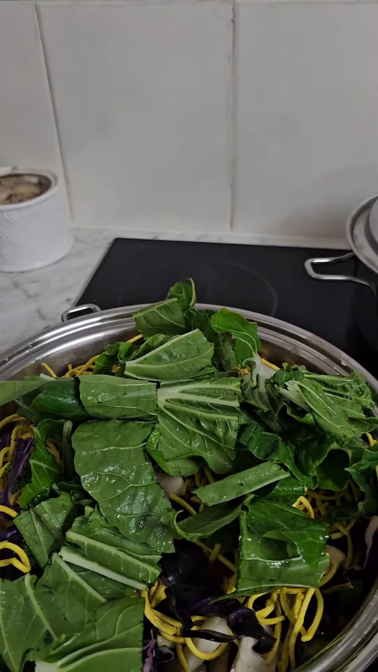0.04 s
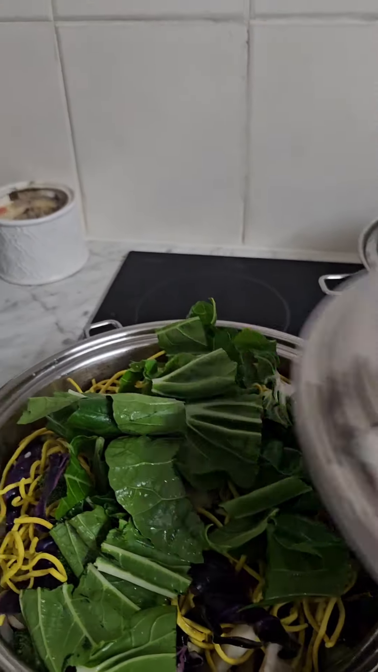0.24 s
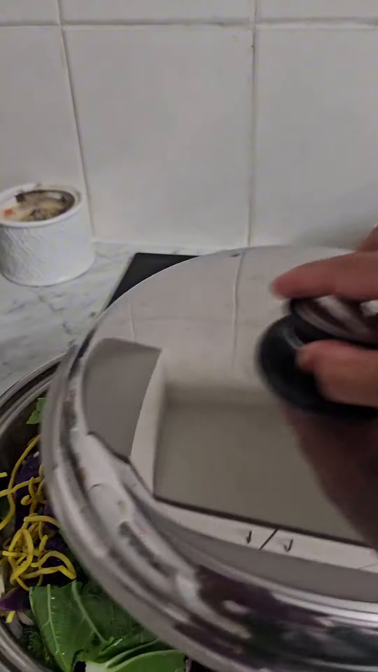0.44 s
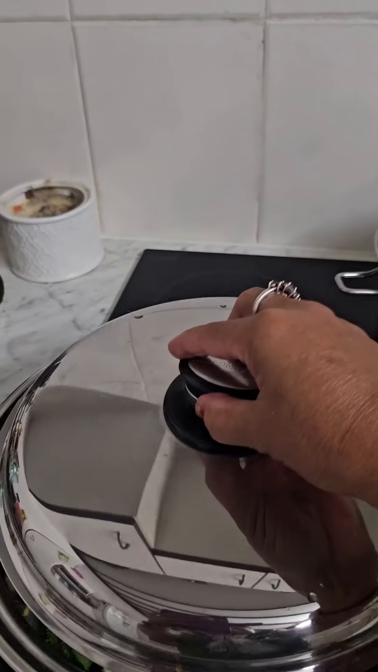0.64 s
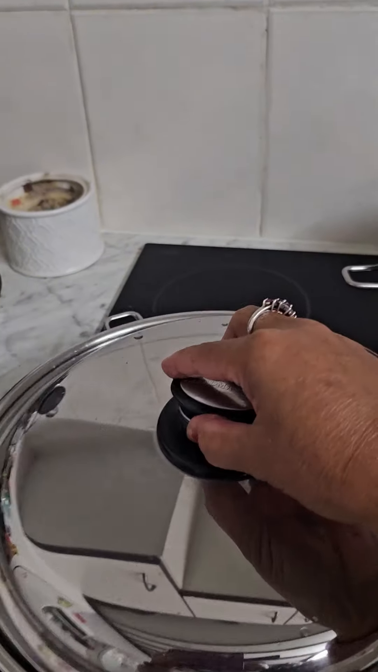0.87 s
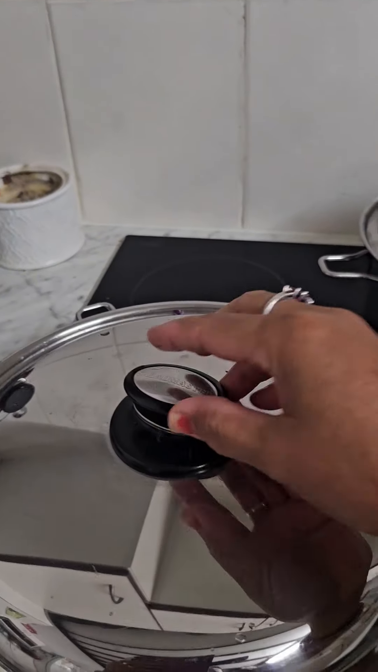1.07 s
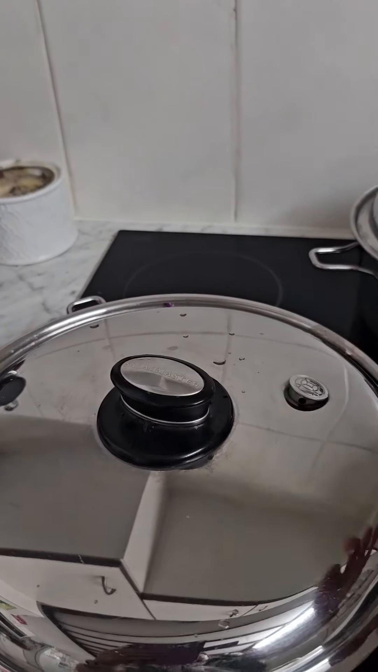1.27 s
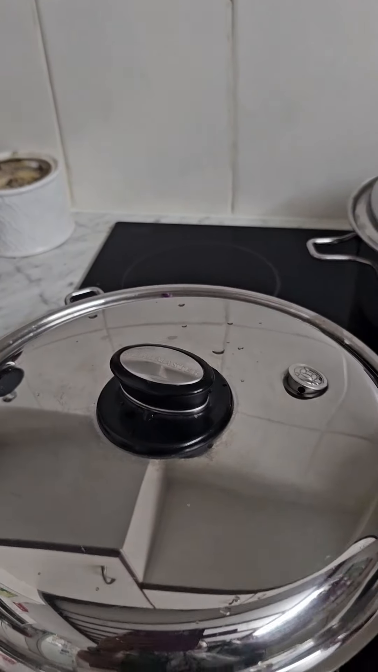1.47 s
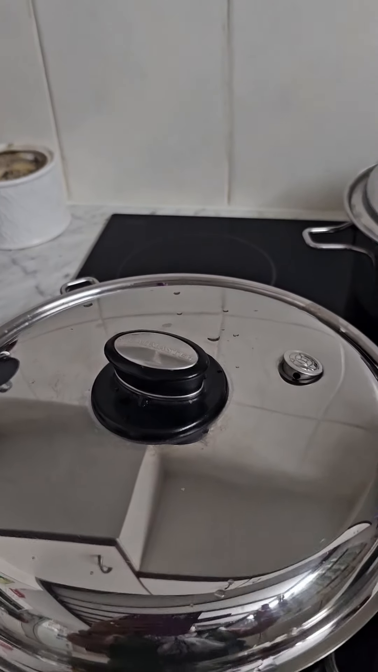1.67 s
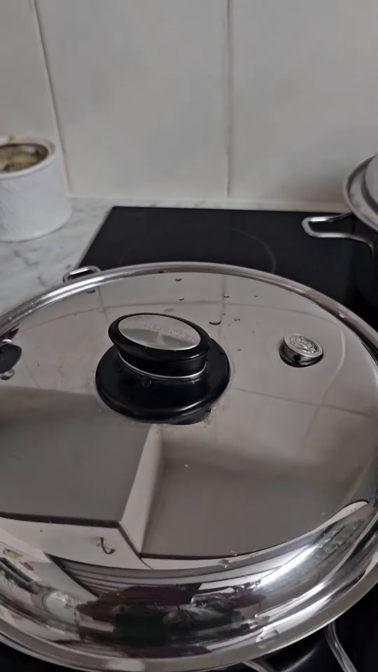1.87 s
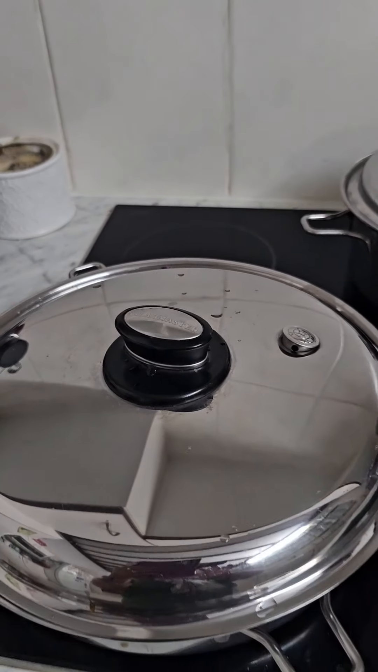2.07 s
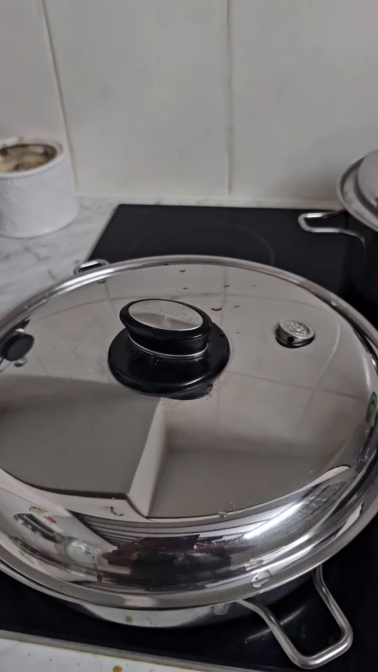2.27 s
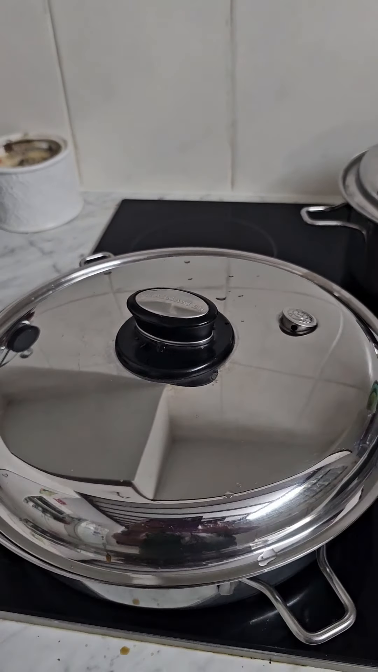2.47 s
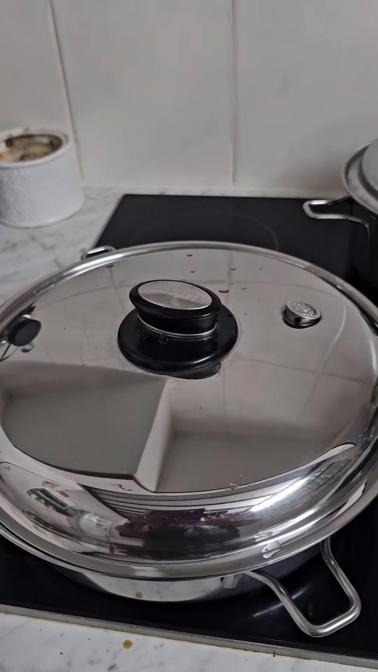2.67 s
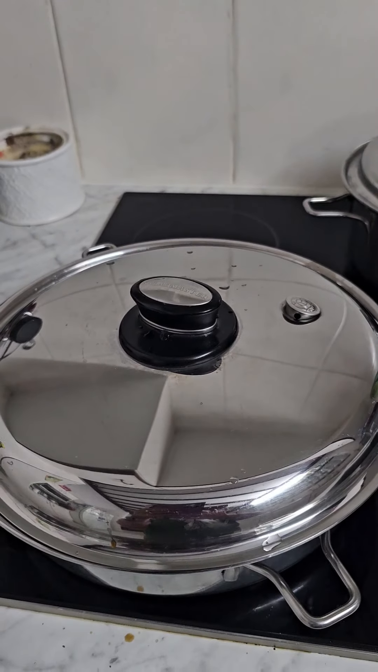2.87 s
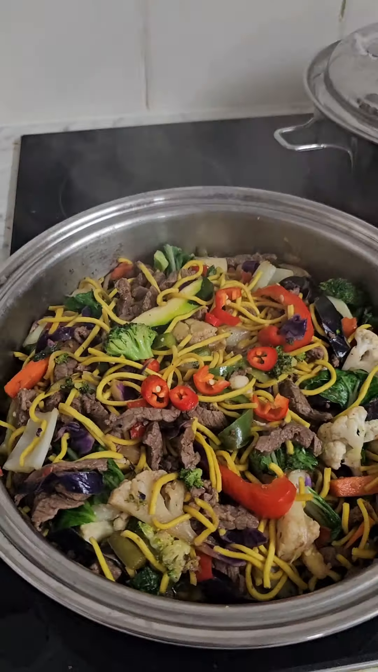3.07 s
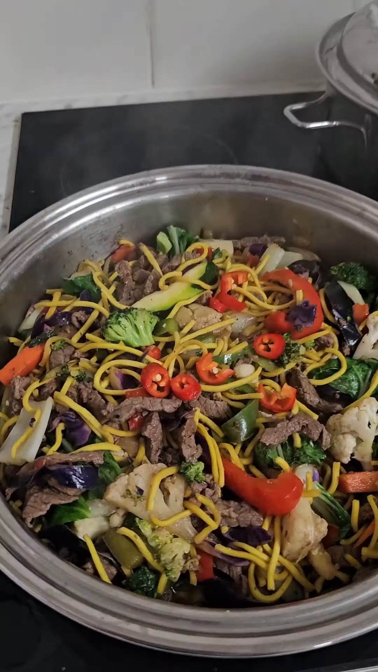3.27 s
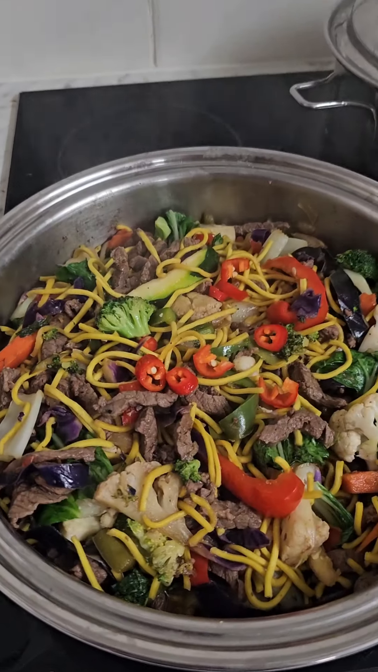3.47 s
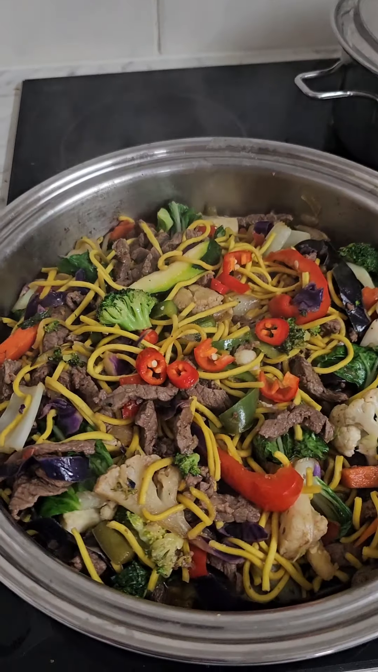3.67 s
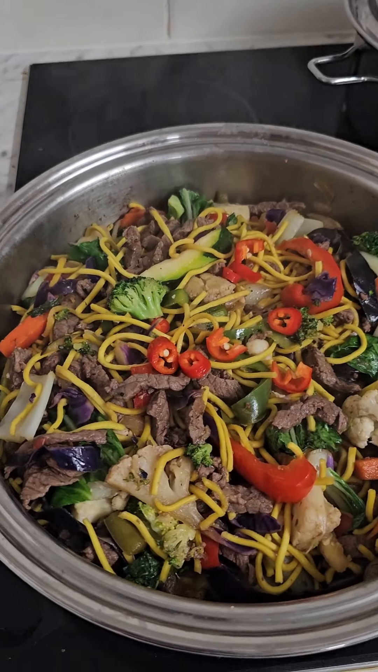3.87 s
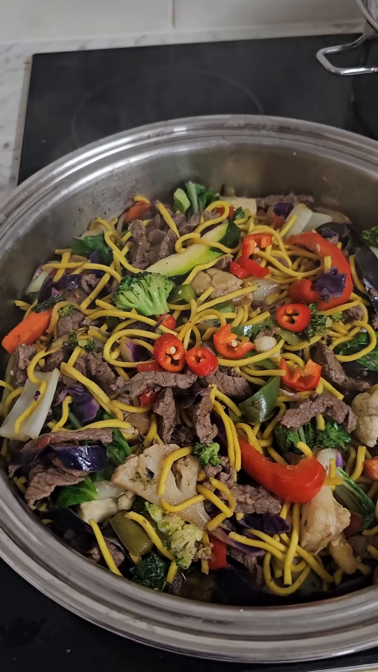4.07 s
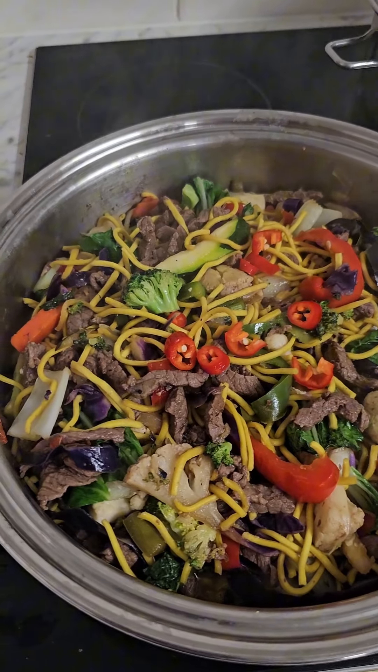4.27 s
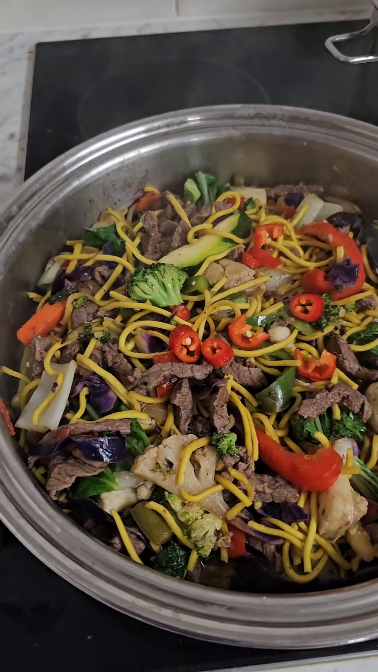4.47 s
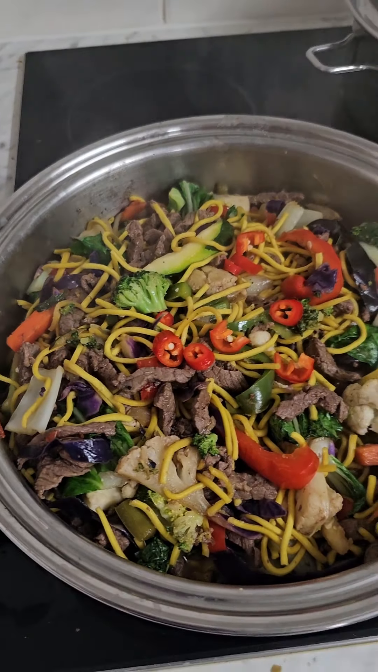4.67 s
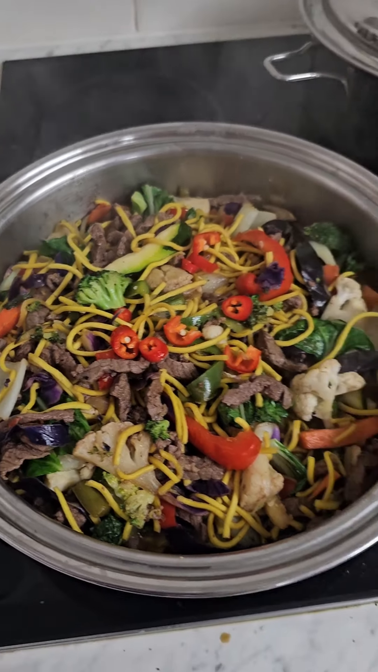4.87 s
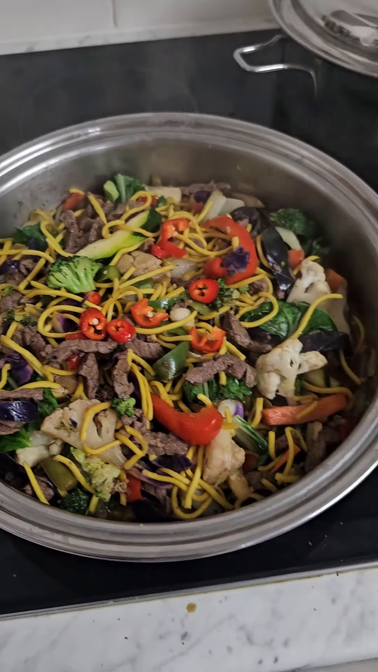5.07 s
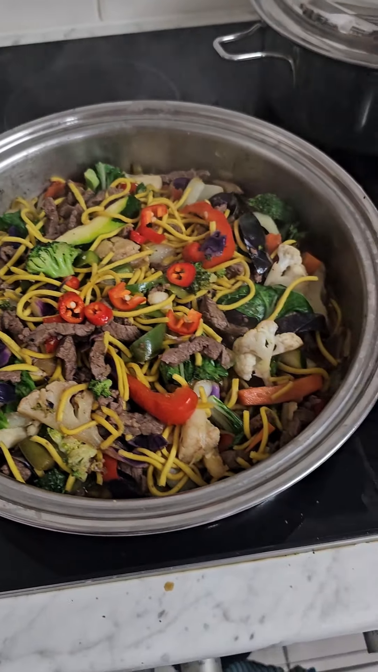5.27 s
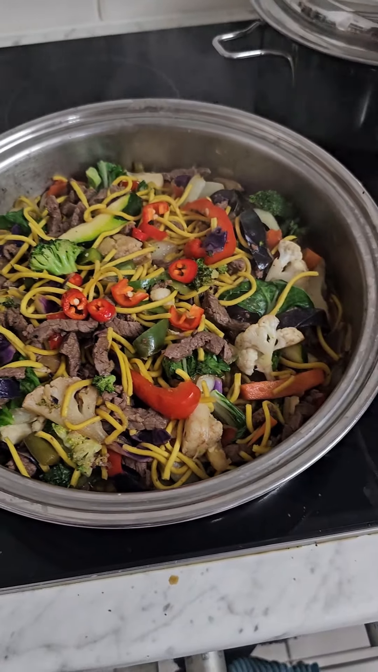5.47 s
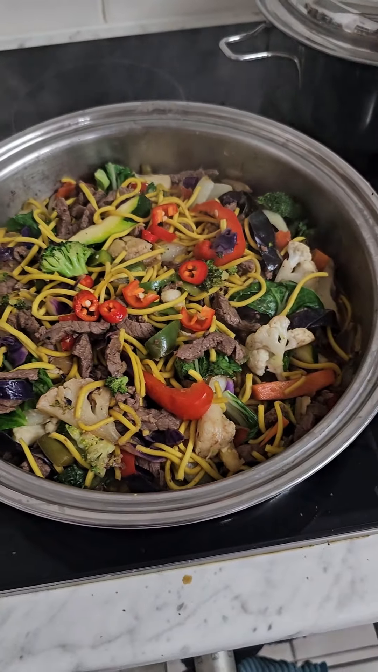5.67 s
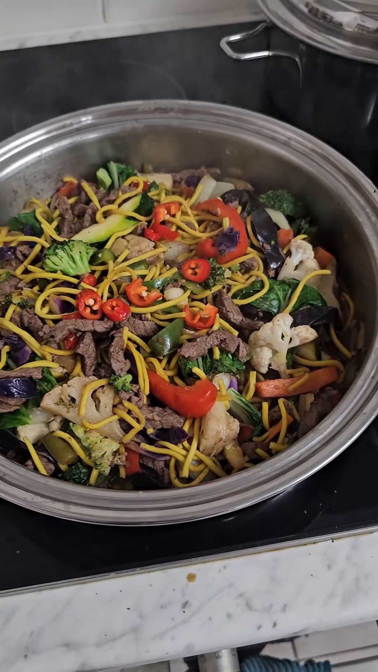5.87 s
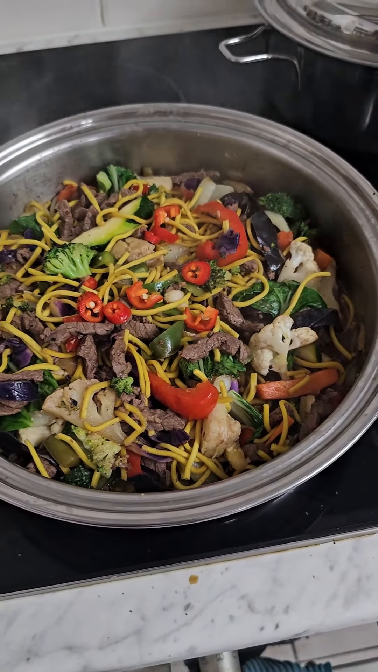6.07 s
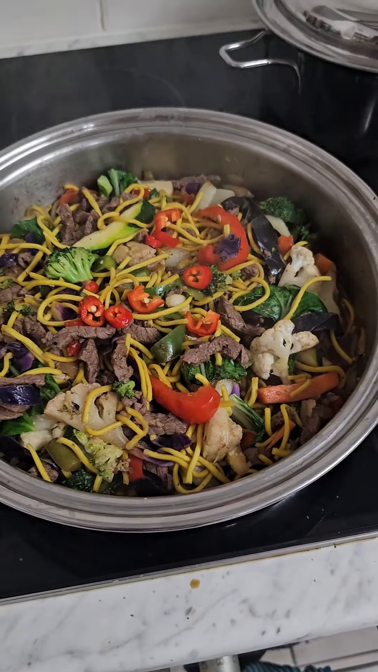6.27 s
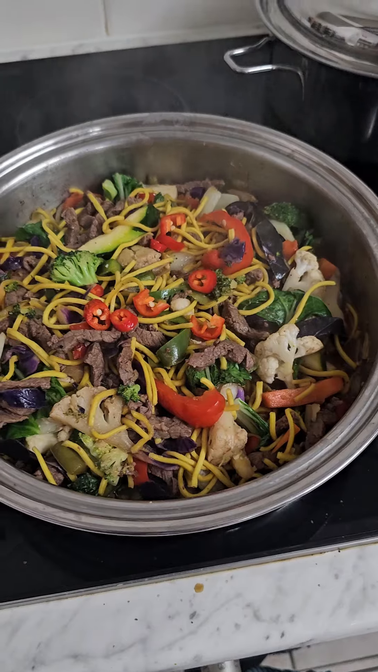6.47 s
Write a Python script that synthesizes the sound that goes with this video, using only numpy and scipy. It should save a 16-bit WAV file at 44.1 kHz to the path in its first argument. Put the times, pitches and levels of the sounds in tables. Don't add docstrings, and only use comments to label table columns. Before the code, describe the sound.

A steel lid clanks, rocks and settles onto a sizzling pan, muffling it to rumble; then an open pan simmers beside a steadily clinking steel weight.

```python
import sys
import numpy as np
from scipy import signal
from scipy.fft import rfft, irfft, next_fast_len
from scipy.io import wavfile
from scipy.ndimage import uniform_filter1d

SR = 44100
rng = np.random.default_rng(int(sys.argv[2]) if len(sys.argv) > 2 else 0)


def unload_audio(sound):
    columns = np.transpose(np.atleast_2d(sound))
    steps = np.round(np.clip(columns, -1, 1) * 32767)
    wavfile.write(sys.argv[1], SR, steps.astype(np.int16))


def attenuation_scalar(level_db):
    decades = np.asarray(level_db, float) / 20
    return 10 ** decades


N = 287532
CUT_S = 3.112

# (pitch [Hz], level [dB], time to fade by 60 dB [s])
LID_TILTED = [(117.7, -10, 0.49), (301.5, 1.5, 0.086), (402, 4, 0.12), (566, -8.5, 0.27), (702, -5, 0.13),
              (1060, -8, 0.11), (1188, -19.5, 0.39), (1323, -29, 0.14)]
LID_ROCKING = [(131, -9.5, 0.51), (282.7, 1.5, 0.46), (369.6, -9.5, 0.68), (500, 1.5, 0.2),
               (558, -7.5, 0.43), (693, -8, 0.37), (826, -6, 0.13), (1072, -13, 0.3), (1134, -7, 0.34),
               (1355, -11.5, 0.12)]
LID_SLIDING = [(282, 1, 0.21), (486.9, -21, 0.41), (836, -6, 0.18), (1080, -24, .3), (1125, -5, 0.27),
               (1173, -8, .4), (1330, -20, 0.092), (2010, -35, .6), (2170, -45, 0.55), (2950, -51, 0.23),
               (3900, -29, 0.22), (5124, -31, 0.16), (5543, -34, 0.13), (6260, -26, 0.23)]
LID_SEATED = [(112.6, -12.5, 0.28), (270.6, -2.5, 0.19), (300, -0.5, 0.11), (376, -13, 0.17),
              (420, -23, 0.11), (506, -20.5, 0.19), (605, -27, 0.11), (690, -20.5, 0.22), (990, -24, 0.067),
              (1050, -21, 0.11), (1200, -25.5, 0.37), (1980, -44, 0.15), (2900, -56, 0.15),
              (5070, -41.5, 0.1), (6290, -40, 0.1), (7440, -48, 0.2)]
LID_AT_REST = [(116, 1, 0.15), (300, 1, 0.077), (341, -2, 0.14), (710, -24, 0.099), (1230, -17, 0.18),
               (1870, -32, 0.097), (2770, -25, 0.15), (4021, -18, 0.22), (3800, -17, 0.12),
               (5000, -28, 0.11), (7530, -42, .15)]
# (pitch [Hz], level [dB], fade time [s])
DOME = [(1946, 0, .35), (2186, -14, .3)]
RIM_FREE = [(4807, -3, .13), (5071, -3, .12), (6051, -7, .5), (6815, -11, .5), (7138, -9, .5),
            (8317, -10, .5), (8635, -5, .25), (9259, -9, .5), (9798, 0, .15), (10690, -8, .15),
            (10940, -8, .33), (11280, 0, .11)]
RIM_TOUCHING = [(2864, -16, .4), (3822, -16, .26), (4032, -16, .4), (5066, -3, .14), (5150, -3, .16),
                (5543, -6, .2), (6288, -7, .2), (6525, -3, .2), (7142, -8, .25), (7480, -8, .2),
                (8436, -7, .2), (10160, -7, .13), (11720, -11, .2)]
# (pitch [Hz], level [dB], fade time [s])
RUBBED_TONES = [(1187, 2, 0.27), (1133, -17, 0.26)]
# (pitch [Hz], left minus right [dB])
LID_LEAN = [(300, 0), (400, -1.5), (500, -3), (560, 6), (700, 5.5), (830, 5), (1070, -2.5), (1187, -6),
            (1946, -6), (3000, -1)]

# (time [s], body level [dB], 1 kHz rim level above body [dB], clink level above body [dB])
KNOCKS = [
    (0.707, -5, -16, -23),
    (0.711, -16.5, -12, -5),
    (0.749, -39, 4, -23),
]
ROCKS = [
    (0.7885, -7, -10, -14),
    (0.805, -20, 4.5, -13),
    (0.810, -24, -6, 4.5),
    (0.821, -16, -3.5, -10),
]
SLIDES = [
    (0.834, -14, -10, -18),
    (0.85, -18, -12, -15),
    (0.866, -36, -15, -13),
]
SEATS = [
    (0.897, -10.5, -28, -42),
    (0.91, -14, -13, -24),
    (0.922, -12.5, -27, -29),
    (0.937, -14.5, -36, -37),
    (0.948, -15, -52, -40),
    (0.972, -24, -28, -13),
]
SETTLES = [
    (1.004, -21.5, -26, -21),
    (1.044, -44, -14, -17),
]
# (time [s], peak level [dB])
DOME_BLOWS = [
    (.708, -30),
    (.789, -33),
    (.81, -40),
    (.835, -35),
    (.91, -49),
]
# (time [s], pitch [Hz], peak level [dB], fade time [s])
RIM_RINGS = [
    (.712, 6090, -51, .3),
    (.792, 5090, -32, 0.11),
    (.806, 5110, -31, 0.15),
    (.808, 6525, -37, 0.21),
    (.865, 5160, -44, 0.13),
    (1.003, 4021, -47, 0.14),
    (1.012, 2867, -51, 0.18),
    (1.003, 5030, -48, 0.12),
]
# (time [s], level [dB])
CHATTER_LEVEL = [
    (0.707, -39.5),
    (0.713, -40),
    (0.771, -55.5),
    (0.811, -39.5),
    (0.893, -50.5),
    (0.917, -44.5),
    (0.953, -55),
    (1.017, -58),
    (1.12, -96),
]
# (pitch [Hz], level per Hz [dB])
CHATTER_COLOUR = [(1350, -13), (2100, -2), (2450, -17), (2900, -6.5), (3300, -14), (3700, -13), (4000, -14),
                  (4600, -15.5), (5100, -8.5), (6340, -12), (10600, -9), (13300, -6), (16000, -21)]

# (pitch [Hz], level [dB], fade time [s])
VALVE_MODES = [(1195, 0, .2), (1270, -4, .17), (1570, -8, .15), (2000, -14, .15), (2550, -9, .15),
               (2685, -4, .25), (3270, -3, .25), (3380, -6, .2), (3870, -8, .2), (4010, -3, .2),
               (4090, -8, .2), (4480, -8, .25), (4710, 0, .24), (4770, -7, .26), (4830, -4, .26),
               (4955, -9, .28), (5250, -9, .3), (5290, -2, .22), (5650, -3, .3), (5690, 0, .24),
               (5819, -5, .2), (6170, -3, .22), (6210, -9, .3), (6330, -9, .2), (6655, -3, .27),
               (6718, 1, .24), (6840, -7, .15), (7250, -8, .15), (7620, -5, .2), (7765, 0, .22),
               (7690, -6, .2), (7865, -4, .2), (7980, -4, .24), (8090, -6, .3), (8180, -8, .2),
               (8410, -10, .2), (8740, -5, .2), (8948, 0, .3), (9730, -4, .17), (9850, -7, .17),
               (10175, -3, .22), (10980, -8, .13), (11490, -8, .2), (11810, -5, .17), (12210, -4, .13),
               (12490, -7, .12), (12870, -7, .13), (13505, -5, .13), (14390, -10, .11), (15240, -12, .11)]
# (time [s], peak level [dB], lid knock [dB], 8 kHz ring [dB], 9 kHz ring [dB])
DROPS = [(3.332, -23.5, 3, 1, 4), (3.5787, -22, -1.5, 1, 5), (3.913, -21, 0, 3, 3),
         (4.2187, -20.5, -4, 1, 3.5), (4.5303, -22.5, -1.5, 0, 1), (4.8817, -21, -2, 0.5, 4.5),
         (5.1794, -21, -3, 2, 12), (5.5144, -20.5, 2, -7, -5), (5.8388, -23.5, 2, 1, 7.5),
         (6.15, -21.5, 3.5, -0.5, -6), (6.44, -21, -4, 1, 12.5)]
DROP_BANDS_DB = [-14, -14.5, -5.5, -6, -18, -4.5]
VALVE_CROWD_DB = [-18.5, -11, -4]
SEAT_NULLS_HZ = [7050, 9330]
TICK_SHARPNESS_DB = [0, 14, 3, 8, 1, -2, -4, 1, 3, -5, -3]

# (time [s], peak level [dB], starting pitch [Hz])
BUMPS = [
    (1.317, -36, 580),
    (1.658, -31, 300),
    (2.025, -38, 300),
    (2.326, -32.5, 287),
]
# (time [s], peak level [dB], centre pitch [Hz], fade time [s])
TAPS = [
    (1.329, -54.5, 3020, 0.046),
    (1.503, -47, 3760, 0.047),
    (1.658, -38, 3460, 0.038),
    (2.164, -46.5, 5000, 0.14),
    (2.3218, -32, 4840, 0.056),
    (2.648, -64, 1500, .03),
    (2.7918, -60.5, 3810, 0.022),
    (3.6743, -43, 900, 0.018),
    (4.2895, -43, 900, 0.025),
    (4.3069, -45, 1500, 0.017),
]
# (time [s], peak level [dB], centre pitch [Hz], fade time [s])
RUSTLES = [
    (1.713, -42, 3400, 0.067),
    (1.889, -50.5, 4600, 0.27),
    (1.959, -42, 2950, 0.14),
    (1.962, -46, 1200, 0.13),
    (2.02, -54, 2500, 0.17),
    (2.671, -54, 2500, 0.066),
]
# (time [s], peak level [dB])
POPS = [
    (0.108, -41),
    (0.2124, -36),
    (0.4768, -44),
    (3.1797, -51),
    (3.6694, -44),
    (5.0192, -51),
    (5.6234, -55.5),
]

# (pitch [Hz], level per Hz [dB])
FIRST_SIZZLE = [(88, -53), (150, -21), (201, -29.5), (259, -27.5), (361, -27), (383, -16), (504, 2.5),
                (534, 8), (566, -4), (805, 4.5), (871, -1), (1260, -2), (7470, -17.5), (16000, -25)]
HISS = [(590, -48), (1000, -16), (1310, -1), (1550, -8), (1790, -4), (1960, -5.5), (5630, -14.5),
        (16000, -22.5)]
OPEN_PAN = [(13, -58), (22, -6), (118, 2.5), (200, -17), (278, 3.5), (337, -15), (482, -2), (585, -9),
            (792, -5), (988, -13), (1450, -10), (2020, -15), (2590, -20), (8030, -27), (16000, -33.5)]
# (time [s], level [dB])
SIZZLE_DB = [(0, -51), (.34, -53), (.6, -57), (.72, -54)]
HISS_DB = [(1.06, -63), (1.58, -59.5), (2.73, -66), (3.11, -66)]
# (pitch [Hz], level per Hz [dB])
RUMBLE = [(13, -31), (22, -20), (59, 0.5), (119, -9.5), (149, -17.5), (174, -30), (273, -3.5), (337, -13),
          (374, -6.5), (468, -17), (511, -11.5), (567, -29), (846, -17.5), (939, -32.5), (1400, -33),
          (1820, -77), (3080, -120)]
DEEP = [(25, -25), (45, -3), (70, 5), (100, 2), (140, -33)]
# (time [s], level [dB])
RUMBLE_DB = [(0, -53.5), (.6, -51), (1.1, -47), (2.2, -47), (2.5, -49), (3.12, -48)]
DEEP_DB = [(0, -60), (.6, -55.5)]
# (pitch [Hz], side minus mid [dB])
WIDTH = [(30, -36), (90, -14), (180, -54), (350, -8.5), (700, -7), (1400, -4), (3000, 1), (16000, -2.5)]
# (pitch [Hz], time to fade by 60 dB [s])
ROOM_T60_S = [(125, 0.18), (500, 0.46), (2000, 0.4), (6000, 0.38), (14000, 0.23)]
# (pitch [Hz], level [dB])
MICROPHONE = [(20, 0), (5000, 0.5), (7800, 2), (8800, -0.5), (9800, -2.5), (12500, -1.5), (16000, -1.5)]


def lid():
    out = np.zeros((2, N))
    weak = crowd(280, 1034, -20, 0.085, count=12)
    tilted = LID_TILTED + DOME + RIM_FREE + weak
    rocking = LID_ROCKING + DOME + RIM_TOUCHING + weak
    # (blows, modes, share of fade time kept, longest fade [s], dome above rim [dB], gripped at [s])
    stages = [(KNOCKS, tilted, .7, .5, -26, .787),
              (ROCKS, rocking, .45, .6, -28, .89),
              (SLIDES, LID_SLIDING, .4, .5, -26, .89),
              (SEATS, LID_SEATED, .8, .5, -24, 1.0),
              (SETTLES, LID_AT_REST, .9, .5, -9, 1.07)]
    grip_t60_s = 0.061
    for blows, modes, damp, longest, dome_db, grip_s in stages:
        for s, db, rim_db, clink_db in blows:
            levels = db + np.array([-2, rim_db + 3.0, rim_db + dome_db, clink_db - 4.5])
            steel = ring(modes, [800, 1600, 2300], levels, 1.3, damp, longest, 1.0, 1800, LID_LEAN)
            held = np.maximum(s + np.arange(steel.shape[1]) / SR - grip_s, 0)
            add(out, s, steel * attenuation_scalar(-60 * held / grip_t60_s), .8, lag=5)
            clink = burst(14600, 0.52, 0.42, 0.11, 0.25)
            add(out, s, attenuation_scalar(db + clink_db + 0.5) * clink, .5, lag=5)
            body = burst(610, 0.58, 0.75, 0.088, 0.99)
            add(out, s, attenuation_scalar(db - 16.5) * body, .5, lag=5)
    for s, db in DOME_BLOWS:
        add(out, s, ring(DOME, [], [db], 1.0, 0.9, 1., 1.1, 4400, LID_LEAN), .8, lag=5)
    for s, hz, db, t60 in RIM_RINGS:
        pair = [(hz, 0, t60), (hz * 0.91, -7, t60)]
        add(out, s, ring(pair, [], [db], 1., 0.92, 1., 1.5, 6200), .8, lag=5)
    rubbed = ring(RUBBED_TONES, [], [-20.5], 0., 0.78, 1., 12, 2500, LID_LEAN)
    add(out, .822, rubbed, .4, lag=5)
    scrape = curve(CHATTER_LEVEL, 0.0069) * steady(CHATTER_COLOUR, 0.57, 1.1, 2.5, 3.0, 5.2)
    return out + attenuation_scalar(0.5) * chatter() + attenuation_scalar(3.0) * scrape


def chatter():
    a, size = int(.7 * SR), SR // 2
    strength = attenuation_scalar(4.8 * np.minimum(rng.exponential(1, size), 4))
    contacts = rng.standard_normal(size) * strength * (rng.random(size) < .02)
    modes = [(hz, db - 15, t60) for hz, db, t60 in RIM_TOUCHING]
    modes += crowd(3890, 16060, -20, 0.093, count=90)
    steel = ring(modes, [4500, 9000], [-9, 0, -5], 2.6, 0.37, 0.1, 0.088, 1500)
    steel = steel / np.sqrt((steel ** 2).sum() / 2 * np.mean(contacts ** 2))
    contacts = contacts * curve(CHATTER_LEVEL, 0.0024)[a:a + size]
    out = np.zeros((2, N))
    add(out, .7, signal.fftconvolve(contacts[None], steel, axes=1), .5, lag=5)
    return out


def valve():
    out = np.zeros((2, N))
    pan_db, longest_s, bounce_s, lift_lead_s = 6, .36, .0028, 0.048
    weak = crowd(4550, 16600, 0, 0.13, count=70) + crowd(1300, 4220, 0, 0.18, count=24)
    for s, db, knock_db, ring8_db, ring9_db in DROPS:
        levels = db + np.array(DROP_BANDS_DB) + np.array([knock_db, 0, 0, ring8_db, ring9_db, 0])
        drop = ring(VALVE_MODES, [2016, 4300, 7080, 8500, 9300], levels, 1.8, 0.56, longest_s, 0.4, 1900)
        weak_levels = db + np.array(VALVE_CROWD_DB)
        drop = drop + ring(weak, [4300, 9000], weak_levels, 4.3, 0.84, longest_s, 0.21, 1400)
        add(out, s, drop, pan_db, lag=-4)
        add(out, s + bounce_s, attenuation_scalar(-9.5) * drop, pan_db, lag=-4)
        crack = burst(7900, 0.77, 0.56, 0.0085, 0.3)
        add(out, s, attenuation_scalar(db - 3.5) * crack, pan_db, lag=-4)
        rattle = burst(6600, 0.85, 1.0, 0.14, 0.27)
        add(out, s + bounce_s, attenuation_scalar(db - 2.5) * rattle, pan_db, lag=-4)
        add(out, s - lift_lead_s, attenuation_scalar(-35) * burst(123, 0.97, 2.3, 0.085, 0.95))
        add(out, s, attenuation_scalar(-35.5) * burst(193, 0.95, 1.4, 0.055, 0.87))
    add(out, CUT_S, attenuation_scalar(-41.5) * burst(5200, 0.81, 1.5, 0.22, 0.33), 3.0)
    for hz in SEAT_NULLS_HZ:
        out = signal.lfilter(*signal.iirnotch(hz, 25., SR), out)
    return out


def ticks():
    out = np.zeros((2, N))
    for (s, db, *_), sharp_db in zip(DROPS, TICK_SHARPNESS_DB):
        tick = burst(14200, 0.12, 1.4, 0.014, 0.3)
        add(out, s, attenuation_scalar(db - 11 + sharp_db) * tick, 6, lag=-4)
    return out


def taps():
    out = np.zeros((2, N))
    for s, db, hz in BUMPS:
        add(out, s, attenuation_scalar(db) * thump(hz))
    for s, db, hz, t60 in TAPS:
        add(out, s, attenuation_scalar(db + 5.0) * burst(hz, 1.43, 0.54, t60, 0.31), lag=4)
        add(out, s, attenuation_scalar(db - 2.5) * burst(470, 0.85, 0.35, t60, 0.66), lag=4)
    for s, db, hz, t60 in RUSTLES:
        add(out, s, attenuation_scalar(db) * burst(hz, 0.7, 11, t60, 0.15), lag=4)
    for s, db in POPS:
        add(out, s, attenuation_scalar(db - 4.0) * burst(5630, 1.0, 0.22, 0.02, 0.6))
    return out


def thump(start_hz):
    end_hz, fall_s = 79.5, 0.0077
    t = np.arange(SR // 10) / SR
    turns = end_hz * t + (start_hz - end_hz) * fall_s * (1 - np.exp(-t / fall_s))
    swell = (t / 0.013) * np.exp(1 - t / 0.0064)
    return np.tile(np.sin(2 * np.pi * turns) * swell, (2, 1))


def crackle(t0, t1, db, count):
    out = np.zeros((2, N))
    for when, size, pitch, side in rng.random((count, 4)):
        spit = burst(2500 + 9000 * pitch, 0.7, 0.17, 0.0047, 0.55)
        add(out, t0 + when * (t1 - t0), attenuation_scalar(db - 5.7 * size) * spit, 6 * side - 1.5)
    return out


def sizzle_and_rumble():
    floor = curve(SIZZLE_DB) * steady(FIRST_SIZZLE, 0, .8, 0.41, 3.4, 3.0, 1.0)
    floor += attenuation_scalar(-1.0) * curve(HISS_DB, 0.64) * steady(HISS, 0.98, CUT_S, 1.4, 3.99, 8.6, 1.0)
    floor += attenuation_scalar(-47.5) * steady(OPEN_PAN, CUT_S, 7, 1.0, 5.26, -3.5, 2.8)
    floor += crackle(0, 0.93, -44.5, count=14)
    floor += crackle(CUT_S, 6.5, -54.0, count=110)
    floor += curve(RUMBLE_DB) * steady(RUMBLE, 0, CUT_S, 0.76, 0., 6.9, 0.57)
    floor += curve(DEEP_DB) * steady(DEEP, 0, .8, 1.0, 0., 5.2)
    return floor


def steady(colour, t0, t1, flicker_db, grain_db=0., lag=0, lean_db=0.):
    a, b = int(t0 * SR), min(int(t1 * SR), N)
    size = next_fast_len(b - a)
    hz = np.maximum(np.fft.rfftfreq(size, 1 / SR), 1)
    strength = attenuation_scalar(grain_db * np.minimum(rng.exponential(1, size), 4))
    drops = None
    drops = attenuation_scalar(grain_db * np.minimum(rng.exponential(1, size), 4) * (rng.random(size) < .05))
    white = rng.standard_normal((2, size))
    grainy = rfft(white * drops) / np.sqrt(np.mean(drops ** 2))
    mid, side = np.where(hz > 1500, grainy, rfft(white))
    side = side * attenuation_scalar(on_log(WIDTH, hz))
    delay = np.exp(2j * np.pi * hz * lag / SR)
    pair = np.array([mid + side, (mid - side) * delay]) * attenuation_scalar(on_log(colour, hz)) * (hz > 15)
    band = np.clip(np.log2(hz / 40) * .8, 0, 7)
    y = 0
    for k in range(8):
        share = np.clip(1 - abs(band - k), 0, 1)
        y = y + irfft(pair * share, size) * attenuation_scalar(flicker_db * walk(9.14, size))
    out = np.zeros((2, N))
    out[:, a:b] = y[:, :b - a] / np.sqrt(np.mean(y ** 2)) * attenuation_scalar([[lean_db / 2], [-lean_db / 2]])
    return out


def room(x):
    t = np.arange(int(.6 * SR)) / SR
    hz = np.fft.rfftfreq(len(t), 1 / SR) + 1
    noise = rfft(rng.standard_normal((2, len(t))))
    side = noise[1] * attenuation_scalar(on_log(WIDTH, hz))
    pair = np.array([noise[0] + side, noise[0] - side])
    octave = np.clip(np.log2(hz / 62.5), 0, 8)
    tail = np.zeros((2, len(t)))
    for k in range(9):
        share = np.clip(1 - abs(octave - k), 0, 1)
        t60 = on_log(ROOM_T60_S, 62.5 * 2 ** k)
        tail += irfft(pair * share, len(t)) * np.exp(-np.log(1000) * t / t60)
    tail = tail * (t > .004)
    tail = tail / np.sqrt((tail ** 2).sum() / 2)
    return signal.fftconvolve(x.mean(axis=0)[None], tail, axes=1)[:, :N]


def ring(modes, band_edges, band_db, scatter_db, damp, longest, rise_ms, spread_hz, lean=((1, 0), (2, 0))):
    hz, db, t60 = np.transpose(modes).astype(np.float32)
    t = np.arange(SR // 4, dtype=np.float32) / SR
    chance = rng.standard_normal((5, len(hz)), dtype=np.float32)
    start = 2 * np.pi * np.minimum(hz / spread_hz, 1) * chance[:2] / 4 + np.pi + 0.31 * chance[4]
    pitch = hz * (1 + 0.0024 * chance[2])
    waves = np.sin(2 * np.pi * pitch[:, None] * t + start[:, :, None])
    fade = np.exp(-np.log(1000) * t / (damp * np.minimum(t60, longest))[:, None])
    rise = 1 - np.exp(-t * 1000 / rise_ms)
    balance = attenuation_scalar(np.outer([.5, -.5], on_log(lean, hz))).astype(np.float32)
    waves = waves * (fade * rise) * attenuation_scalar(db + scatter_db * chance[3])[:, None] * balance[:, :, None]
    band = np.searchsorted(band_edges, hz)
    out = 0
    for k, peak_db in enumerate(band_db):
        part = waves[:, band == k].sum(axis=1)
        out = out + attenuation_scalar(peak_db) * part / abs(part).max()
    return out


def crowd(lo_hz, hi_hz, db, t60, count):
    chance = rng.random((count, 3))
    hz = lo_hz + (hi_hz - lo_hz) * chance[:, 0] ** 1.4
    fade_s = t60 * (.5 + chance[:, 2]) * (5000 / hz) ** 0.13
    return list(zip(hz, db - 8 * chance[:, 1], fade_s))


def burst(centre_hz, octaves, rise_ms, t60, alike):
    t = np.arange(8192) / SR
    hz = np.fft.rfftfreq(len(t), 1 / SR) + 1
    noise = rng.standard_normal((3, len(t)))
    pair = np.sqrt(alike) * noise[0] + np.sqrt(1 - alike) * noise[1:]
    hump = np.exp(-.5 * (np.log2(hz / centre_hz) / octaves) ** 2)
    y = irfft(rfft(pair) * hump, len(t))
    y = y * (1 - np.exp(-t * 1000 / rise_ms)) * np.exp(-np.log(1000) * t / t60)
    return y / abs(y).max()


def add(out, s, y, pan_db=0., lag=0):
    for c, (side, late) in enumerate([(0.74, max(lag, 0)), (-1.15, max(-lag, 0))]):
        a = int(s * SR) + late
        out[c, a:a + y.shape[1]] += attenuation_scalar(side * pan_db / 2) * y[c, :N - a]


def on_log(table, hz):
    f, v = np.transpose(table)
    return np.interp(np.log(hz), np.log(f), v)


def curve(table, fade=0.1):
    s, db = np.transpose(table)
    times = np.r_[s[0] - fade, s, s[-1] + fade]
    return attenuation_scalar(np.interp(np.arange(N) / SR, times, np.r_[-120, db, -120]))


def walk(rate, size):
    k = int(SR / rate)
    held = np.repeat(rng.standard_normal(size // k + 1), k)
    return 0.79 * uniform_filter1d(uniform_filter1d(held, k), k)[:size]


def top_cut(x, hz):
    return signal.sosfilt(signal.ellip(12, .2, 45, hz, fs=SR, output="sos"), x)


def scene():
    worktop = signal.iirnotch(192, 2.2, SR)
    cover = signal.lfilter(*worktop, lid())
    weight = signal.lfilter(*worktop, valve())
    small = taps()
    echo = room(attenuation_scalar(-7.5) * cover + attenuation_scalar(-6.5) * weight + attenuation_scalar(-3.5) * small)
    heard = cover + weight + small + sizzle_and_rumble() + echo
    return top_cut(heard, 15720) + ticks()


def roll_off(x):
    return signal.sosfilt(signal.butter(12, 17150, fs=SR, output="sos"), x)


def record(dry):
    hz = np.fft.rfftfreq(N, 1 / SR) + 1
    coloured = irfft(rfft(dry) * attenuation_scalar(on_log(MICROPHONE, hz)), N)
    return roll_off(top_cut(coloured, 16900))


dry = scene()
out = record(dry)
unload_audio(out)
```